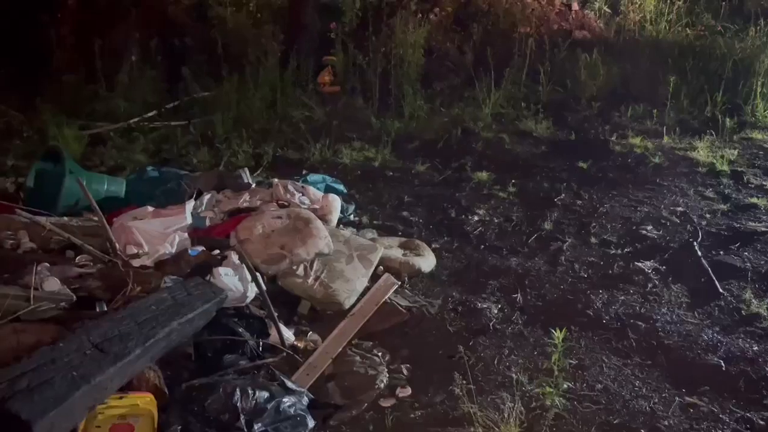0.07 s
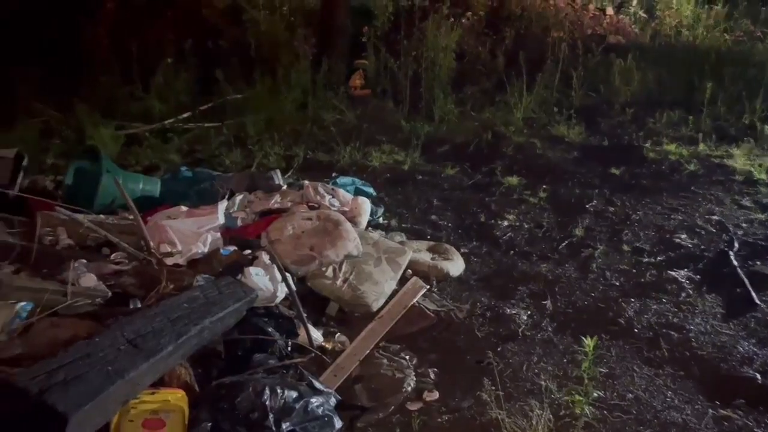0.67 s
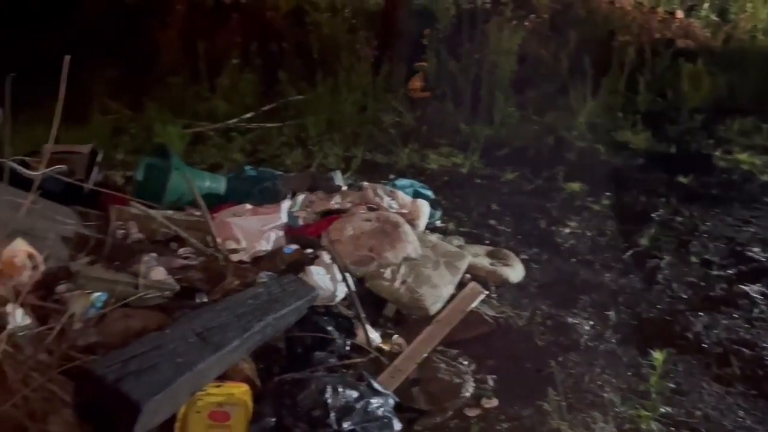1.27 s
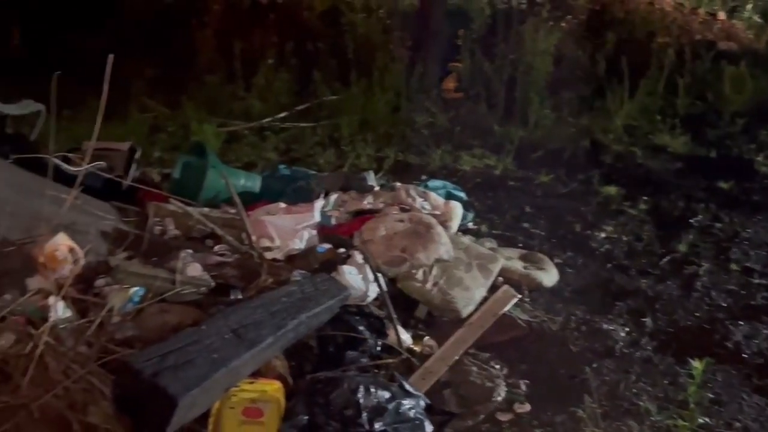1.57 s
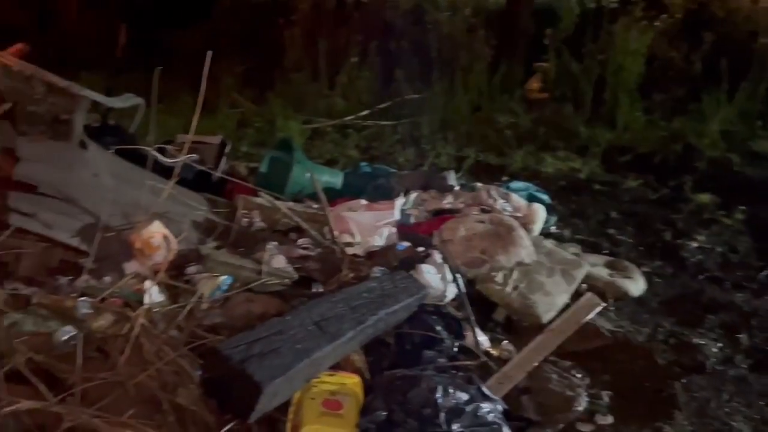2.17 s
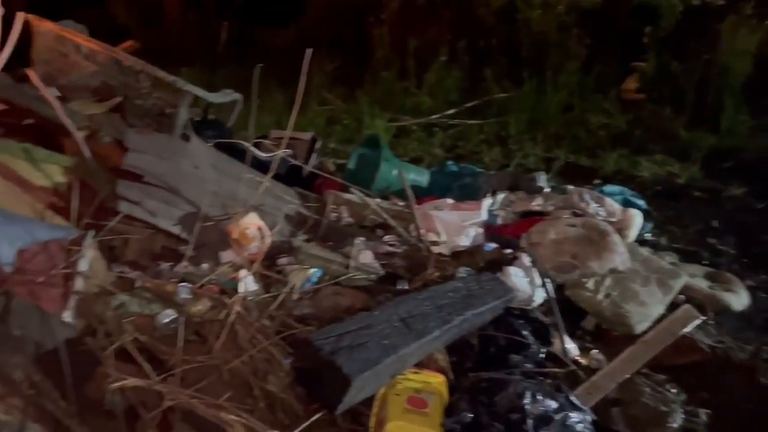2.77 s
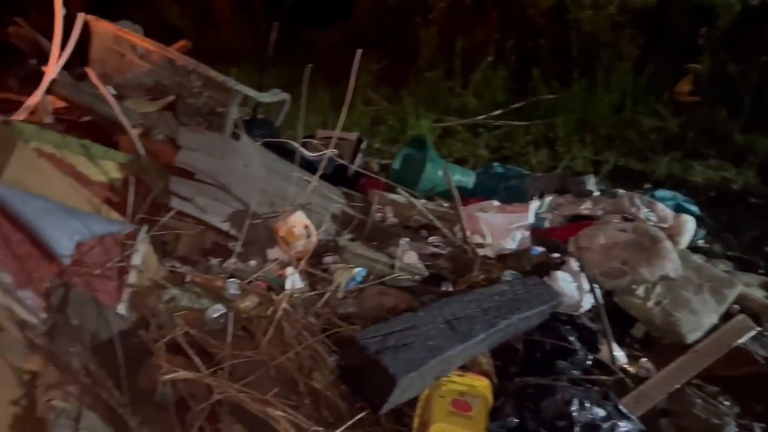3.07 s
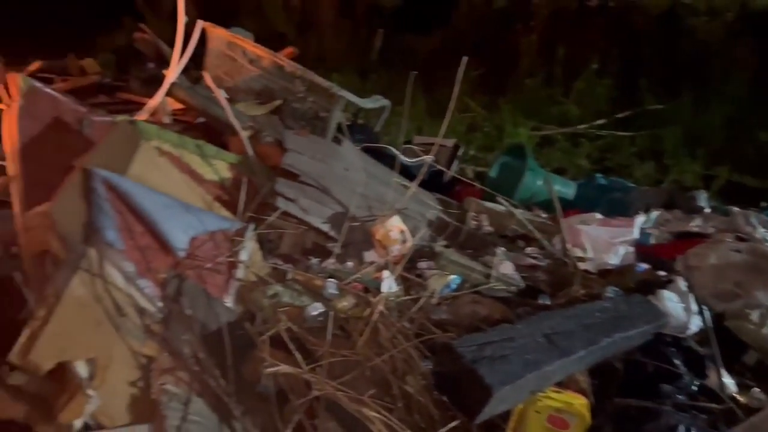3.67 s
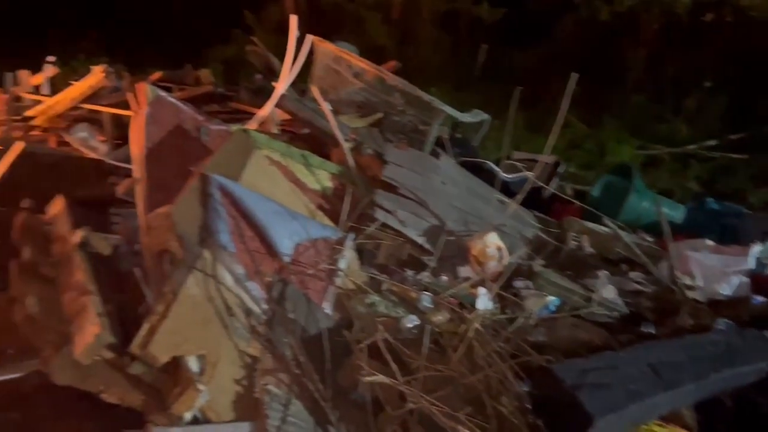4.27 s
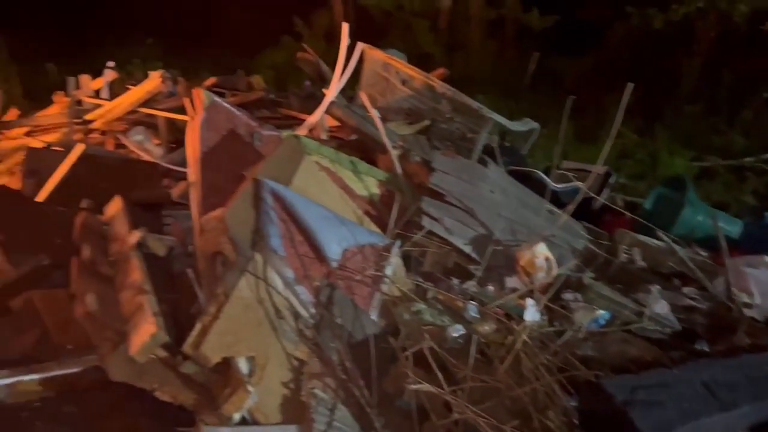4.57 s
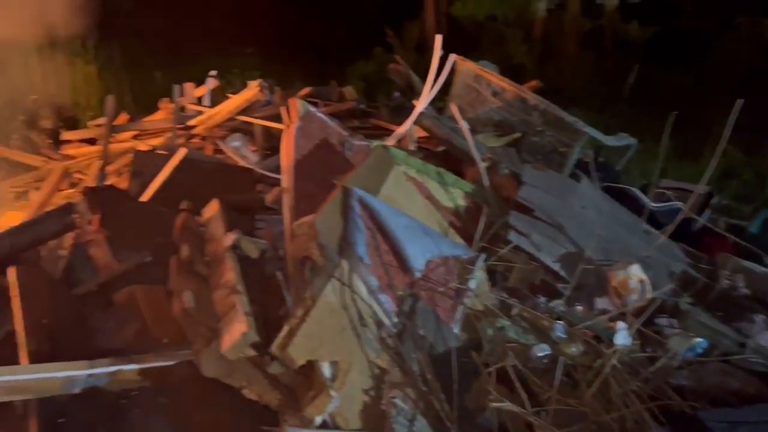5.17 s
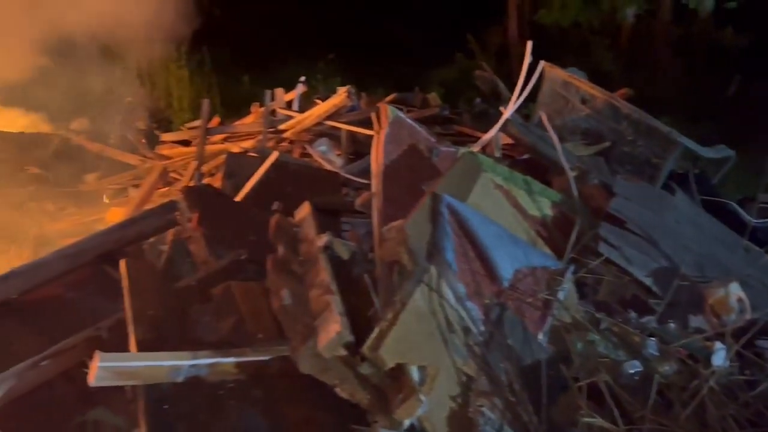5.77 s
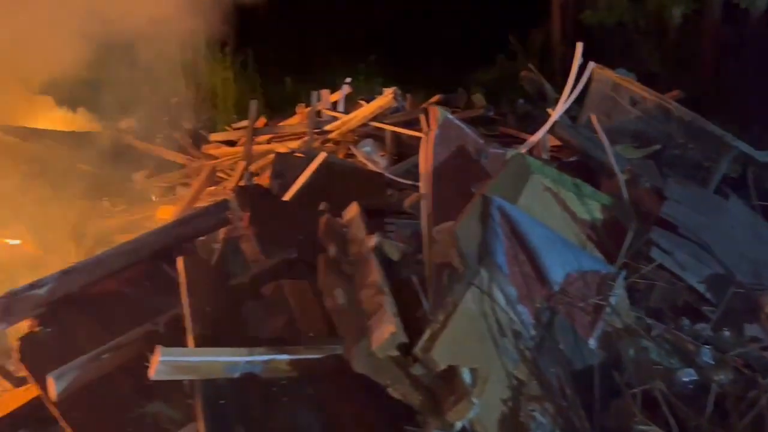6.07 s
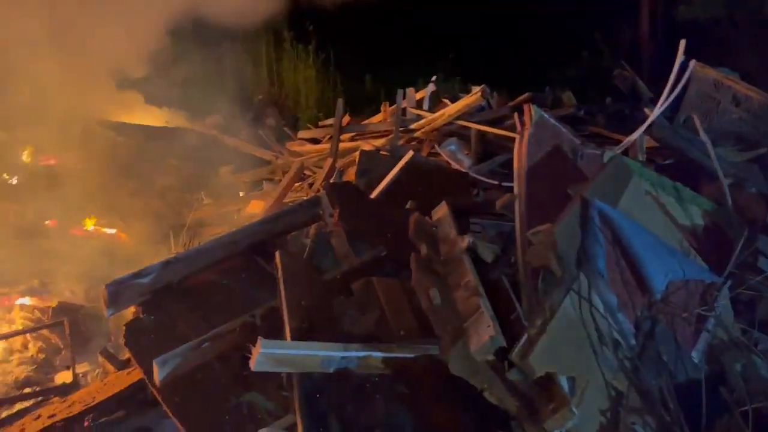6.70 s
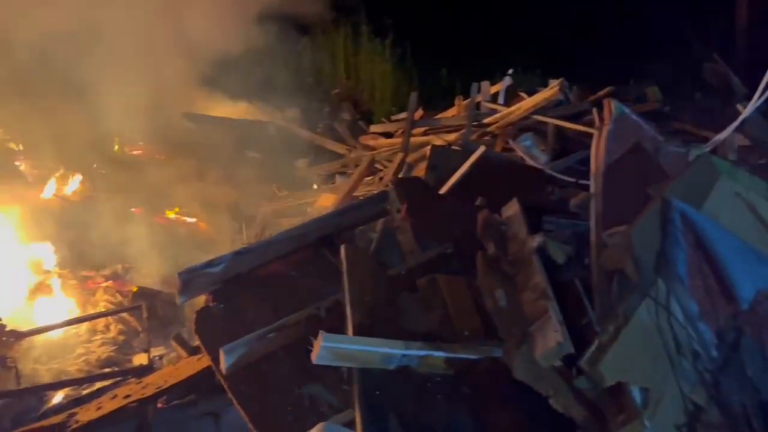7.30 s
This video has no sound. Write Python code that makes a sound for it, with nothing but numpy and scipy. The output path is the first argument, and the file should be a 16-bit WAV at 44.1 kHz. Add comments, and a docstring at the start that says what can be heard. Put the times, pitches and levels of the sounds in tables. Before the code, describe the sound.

Steady fire noise with fine crackle, irregular wood snaps and short sizzles that grow busier, while diesel engines drone far away.

```python
"""Wet timber fire at night

Outdoors, a stereo pair of microphones at the edge of a burning heap of wet timber and rubbish.
The blaze is a steady wash with fine crackle. Splitting wood snaps and boiling sap escapes in short jets
that sizzle or sing, more often as the pair turns to the flames; twice, gas catches with a soft puff.
Far off, two diesel engines idle under a low rumble."""
import sys
import numpy as np
from scipy import signal
from scipy.fft import rfft, irfft
from scipy.io import wavfile
from scipy.ndimage import uniform_filter1d

SR = 44100
rng = np.random.default_rng(int(sys.argv[2]) if len(sys.argv) > 2 else 0)


def generate_wav(sig):
    """Save sig (samples, or channels by samples) to the path in sys.argv[1] as 16-bit PCM at SR."""
    pcm = np.round(np.clip(np.atleast_2d(sig).T, -1, 1) * 32767).astype(np.int16)
    wavfile.write(sys.argv[1], SR, pcm)


N = 332514
TIME = np.arange(N) / SR
BAND_LIMIT_HZ = 12100

# the body and the hiss of the blaze, from the edge of the heap: frequency_hz, relative_db
BODY_SPECTRUM = [(100, -7), (300, -6.5), (600, 4.5), (950, 3), (1080, 1.5), (1190, 6), (1390, 1.5),
                 (1470, 4), (1600, -1), (1900, -1), (2700, -2.5), (3200, -6.5), (4500, -10.5), (7000, -14),
                 (12000, -85)]
HISS_SPECTRUM = [(1500, -10.5), (3000, 5), (4800, 7.5), (7000, 5.5), (9000, 4.5), (10000, -25),
                 (12000, -5.5)]
def blaze(body_db=-60.5, body_facing_db=-1.4, hiss_db=-75, hiss_facing_db=7.5, flicker_db=0.36):
    """The whole fire blends into a soft body and a hiss; the hiss opens up as the pair faces it."""
    body = at_microphones(turbulence(noise(), depth_db=2.0), BODY_SPECTRUM)
    body *= gain_of(body_db + body_facing_db * facing())
    hiss = at_microphones(turbulence(noise(), depth_db=4.5), HISS_SPECTRUM)
    hiss *= gain_of(hiss_db + hiss_facing_db * np.sqrt(facing()))
    return gain_of(flicker_db * drift(2, 40)) * (body + hiss)


def turbulence(sound, depth_db):
    """Turbulent air makes patches of the spectrum swell and fade."""
    spectra = signal.stft(sound, nperseg=1024)[2]
    patches = uniform_filter1d(rng.standard_normal(spectra.shape[1:]), size=6, axis=0)
    patches = unit_rms(uniform_filter1d(patches, size=5, axis=1))
    return signal.istft(spectra * gain_of(depth_db * patches), nperseg=1024)[1][:, :N]


def crackle(level_db=-84, facing_db=5, clicks_per_s=20, ring_cycles=0.62):
    """Countless small splinters each ring for a cycle or two; louder with the pair on the flames."""
    t, out = np.arange(400) / SR, np.zeros((2, N))
    for hz in np.geomspace(1000, 7500, num=10):
        ring = hz ** .3 * np.sin(2 * np.pi * hz * t) * np.exp(-t * hz / ring_cycles)
        out += signal.oaconvolve(clicks(clicks_per_s, spread_db=3), ring[None], axes=1)[:, :N]
    spectrum = [(1000, 2.0), (8000, -1.0), (12000, -27)]
    return gain_of(level_db + facing_db * facing()) * at_microphones(out, spectrum)


# snaps, duller the deeper they lie in the heap: start_s, level_db, ring_hz, ring_relative_db, top_hz
TIMBER_SNAPS = [(1.303, -63, 7100, -22, 6500), (1.45, -65, 3600, -10, 7000), (2.7145, -60, 2400, -7, 8000),
                (2.7516, -47, 4370, -27, 12000), (2.7556, -52, 2030, -4, 8500),
                (3.0315, -60, 1600, -19, 12000), (3.259, -48, 2230, -6, 7460),
                (3.5678, -65, 6500, -12, 12000), (4.0062, -64.5, 8800, -7, 12000),
                (4.4358, -56, 750, -12, 3020), (4.4818, -59.5, 990, -7, 2200),
                (4.5498, -55.5, 1490, -14, 2900), (4.5584, -57, 1500, -10, 3500),
                (4.701, -63, 7760, -4, 12000), (4.7566, -60.5, 8000, -5, 11000),
                (4.9952, -55, 820, -9, 2300), (5.107, -64.5, 6950, -12, 10000),
                (5.1812, -62, 2390, -5, 6000), (5.2545, -55, 7200, -13, 9000), (5.279, -54, 3040, -9, 9000),
                (5.3636, -54, 1510, -13, 8000), (5.3713, -59, 3030, -8, 9000),
                (5.3753, -59, 1880, -10, 7000), (5.398, -59, 1420, -9, 7000),
                (5.439, -56.5, 2350, -14, 7000), (5.4524, -61, 2480, -9, 8000),
                (5.482, -65.5, 1740, 5, 2500), (5.9168, -55, 1200, -10, 4300),
                (5.9389, -51.5, 1700, -21, 12000), (6.0482, -61, 1200, -2, 3000),
                (6.071, -61, 3500, -9, 9000), (6.217, -60, 8700, -11, 12000),
                (6.253, -60.5, 4470, -14, 10000), (6.3025, -60, 3900, -13, 9000),
                (6.315, -64.5, 4470, -9, 9000), (6.3952, -46.5, 745, -8, 7150),
                (6.396, -48, 1300, -13, 2900), (6.4037, -58.5, 1160, -3, 2800),
                (6.454, -55, 5200, -8, 8500), (6.535, -49.5, 2040, -4, 2690), (6.5408, -63, 2600, -4, 3300),
                (6.629, -55, 8050, -1, 12000), (6.766, -58, 3070, -5, 10800),
                (6.7918, -58, 5940, -16, 11000), (6.9745, -61.5, 1280, 7.5, 2200),
                (7.011, -56, 1740, -1, 5900), (7.376, -57.5, 920, -1.5, 8100),
                (7.5254, -48.5, 1940, -26, 14000)]
def timber_snaps():
    """Burning timber splits in front of the microphones, standing out of the crackle."""
    out = np.zeros((2, N))
    for start_s, level_db, ring_hz, ring_db, top_hz in TIMBER_SNAPS:
        add(out, start_s, gain_of(level_db) * snap(ring_hz, ring_db, top_hz))
    return out


# the crack and the thud of wood splitting nearby: frequency_hz, relative_db
CRACK_SPECTRUM = [(300, -5), (1100, 1), (1800, -1.5), (2500, 1), (3200, -5.5), (5500, -4.5), (8000, -3),
                  (10000, -12), (12000, -11)]
THUD_SPECTRUM = [(100, -1), (250, 20), (420, -4), (750, 5), (1200, -38), (3000, -53)]
def snap(ring_hz, ring_db, top_hz, crack_db=0.5, thud_db_per_octave=-18):
    """Wood splits with a crack, a thud and a brief ring; big pieces ring low and thud more."""
    low_hz = 0.6 * ring_hz  # a piece radiates little below this
    crack = gain_of(crack_db) * tearing_fibres(CRACK_SPECTRUM, low_hz, top_hz, peak_s=0.0014)
    thud_db = -1 + thud_db_per_octave * np.log2(ring_hz / 1000)
    thud = gain_of(thud_db) * tearing_fibres(THUD_SPECTRUM, 0, top_hz, peak_s=0.0028)
    return crack + thud + gain_of(ring_db) * splinter(ring_hz)


def tearing_fibres(spectrum, low_hz, top_hz, peak_s, scatter_s=0.005, stereo_width=0.76):
    """Fibres tear for a few milliseconds, and the sound scatters faintly off the heap."""
    t, hz = np.arange(2048) / SR, np.fft.rfftfreq(2048, 1 / SR)
    tear = (t / peak_s) ** 2 * np.exp(2 - 2 * t / peak_s)
    scatter = .14 * swell(t, scatter_s)
    mid, side = rng.standard_normal((2, len(t)))
    pair = np.array([mid + stereo_width * side, mid - stereo_width * side])
    band = hz ** 7 / (hz ** 7 + low_hz ** 7 + 1) / np.sqrt(1 + (hz / top_hz) ** 6)
    colour = gain_of(value_at(spectrum, hz) + balance_db(hz))
    return unit_impact((tear + scatter) * irfft(rfft(pair) * band * colour))


def splinter(hz, ring_cycles=4.5, overtone_ratio=1.42, overtone_db=-11):
    """A sliver of wood rings in two damped modes."""
    t = np.arange(2048) / SR
    overtone = gain_of(overtone_db) * np.sin(2 * np.pi * overtone_ratio * hz * t)
    attack = 1 - np.exp(-t / .0006)
    decay = np.exp(-t / (0.00032 + ring_cycles / hz))
    return unit_impact((np.sin(2 * np.pi * hz * t) + overtone) * attack * decay)


# steam from the wet wood, close by: frequency_hz, relative_db
STEAM_SPECTRUM = [(300, 22.5), (3000, 6), (8800, 5), (10000, -6), (12000, 7.5)]
# jets, of which the narrow ones sing: start_s, rise_s, level_db, centre_hz, width_octaves, spit_ratio
STEAM_JETS = [(1.415, 0.024, -66.5, 4460, 0.97, .2), (1.985, .06, -62, 5030, 1.2, 0.13),
              (2.758, 0.039, -51, 6360, 0.91, 0.34), (2.88, .05, -67.5, 6000, 1.1, 0.27),
              (4.48, 0.023, -63, 910, 0.16, 0.57), (4.525, 0.016, -62.5, 2650, 0.66, .6),
              (4.612, 0.027, -63.5, 1220, 0.11, .5), (5.195, 0.044, -57, 5400, 2.1, 0.86),
              (5.355, 0.042, -60.5, 3500, 2.3, 1.1), (5.34, 0.052, -64, 1190, 0.39, 1.1),
              (5.484, 0.03, -54.5, 9500, 2.25, 0.87), (5.935, 0.032, -59.5, 5470, 1.3, 0.57),
              (6.025, 0.052, -61, 4900, 2.1, 0.8), (6.36, 0.04, -59, 830, 0.98, 0.5),
              (6.448, 0.018, -57.5, 6000, 2.1, .7), (6.47, 0.037, -66, 2270, 0.33, 0.54),
              (7.0, 0.088, -66, 1750, 0.041, .2)]
def steam_jets(spits_per_s=260, steepness=1.21, loud_db=-53, loud_top_hz=14000, top_hz_per_db=379):
    """Pockets of boiling sap open, sputter and run out; some hiss smoothly, some spit."""
    sputter = gain_of(1.3 * drift(60, 200))
    hiss = sputter * at_microphones(noise(), STEAM_SPECTRUM)
    bubble = rng.standard_normal((1, 64)) * np.exp(-np.arange(64) / 20)
    bubbles = signal.oaconvolve(clicks(spits_per_s, spread_db=1.5), bubble, axes=1)[:, :N]
    spits = at_microphones(bubbles, STEAM_SPECTRUM)
    out, size = np.zeros((2, N)), SR // 2
    t, hz = np.arange(size) / SR, np.fft.rfftfreq(size, 1 / SR)
    for start_s, rise_s, level_db, centre_hz, width_octaves, spit_ratio in STEAM_JETS:
        part = slice(round(start_s * SR), round(start_s * SR) + size)
        gap_resonance = 1 / (1 + (np.log2((hz + 1) / centre_hz) / width_octaves) ** 2)
        top_hz = loud_top_hz + top_hz_per_db * (level_db - loud_db)  # weaker jets are duller
        lowpass = 1 / np.sqrt(1 + (hz / top_hz) ** 10)
        flow = hiss[:, part] + spit_ratio * spits[:, part]
        jet = unit_rms(irfft(rfft(flow) * gap_resonance * lowpass, size))
        pressure = swell(t, rise_s) ** steepness
        add(out, start_s, gain_of(level_db) * pressure * jet)
    return out


def twig_snaps(count=10, nearest_db=-67, spread_db=5, low_hz=2500, high_hz=8500):
    """Twigs snap faintly at random, more often as the pair turns to the flames."""
    out, chance = np.zeros((2, N)), np.cumsum(facing() ** 2)
    for when, thinness, distance in rng.random((count, 3)):
        start_s = np.interp(when * chance[-1], chance, TIME)
        twig = snap(low_hz + (high_hz - low_hz) * thinness, ring_db=-6, top_hz=BAND_LIMIT_HZ)
        add(out, start_s, gain_of(nearest_db - spread_db * distance) * twig)
    return out


# flares in the heap, alike in both microphones: start_s, level_db, centre_hz
GAS_FLARES = [(0.115, -60, 280), (1.34, -54.5, 185)]
def gas_flares(rise_s=0.033, width_octaves=0.57):
    """Pockets of gas catch with a soft, low puff."""
    out, size = np.zeros((2, N)), SR // 2
    t, hz = np.arange(size) / SR, np.fft.rfftfreq(size, 1 / SR)
    for start_s, level_db, centre_hz in GAS_FLARES:
        band = np.exp(-(np.log2((hz + 1) / centre_hz) / width_octaves) ** 2)
        puff = unit_rms(irfft(rfft(rng.standard_normal(size)) * band, size))
        add(out, start_s, gain_of(level_db) * swell(t, rise_s) ** 2 * puff[None])
    return out


# two diesels far off, in the centre: cycles_per_s, wander_ratio, [(order, level_db)]
DIESELS = [(10.177, 0.00075, [(4, -69.5), (7, -67), (8, -51.5), (9, -59.5), (16, -64.5), (22, -75),
           (23, -75), (24, -73.5), (59, -84)]), (11.32, 0.0078, [(4, -55.5), (5, -59.5), (8, -58.5),
           (10, -66)])]
def far_diesels(waver_db=1.55):
    """Only the low orders of the idling engines carry this far, wavering with the speed and the air."""
    out = np.zeros(N)
    for cycles_per_s, wander_ratio, orders in DIESELS:
        cycles = np.cumsum(cycles_per_s * (1 + wander_ratio * drift(0.297, 2.536))) / SR
        for order, level_db in orders:
            tone = np.sqrt(2) * np.sin(2 * np.pi * (order * cycles + rng.random()))
            out += gain_of(level_db + waver_db * drift(2, 9)) * tone
    return out


# the low background around the heap: frequency_hz, relative_db
RUMBLE_SPECTRUM = [(8, -39), (25, -15.5), (38, -4.5), (50, -1), (75, 0), (100, 1.5), (125, -5.5),
                   (160, -11.5), (210, -10.5), (270, -16), (400, -22.5), (800, -41), (2000, -99)]
def rumble(level_db=-51, waver_db=1.13):
    """The draught and distant machines make a low roar."""
    return gain_of(level_db + waver_db * drift(2, 14)) * at_microphones(noise(), RUMBLE_SPECTRUM)


# the pair turned away from the flames, and facing them: frequency_hz, left_right_likeness
AWAY_LIKENESS = [(90, 1), (200, -0.39), (350, 0.25), (600, -0.29), (900, -0.57), (1450, -0.23),
                 (2300, 0.39), (2900, 0.36), (3900, 0.54), (5200, 0.013), (7500, 0.31), (8600, -0.042)]
FACING_LIKENESS = [(90, 1), (200, 1), (350, 0.92), (600, 0.29), (1300, 0), (2300, 0.5), (2900, 0.094),
                   (3900, 0.28), (7000, 0.082), (8600, 0.55)]
def at_microphones(sources, spectrum, mono_hz=133):
    """Colours two unrelated signals and blends them as the turning pair hears them, at rms 1."""
    hz, (first, second) = np.fft.rfftfreq(N, 1 / SR), rfft(sources)
    colour = gain_of(value_at(spectrum, hz) + balance_db(hz))
    short_waves = hz ** 2 / (hz ** 2 + mono_hz ** 2)  # long waves reach both microphones alike
    views = []
    for likeness in (AWAY_LIKENESS, FACING_LIKENESS):
        apart = np.clip(1 - value_at(likeness, hz), 0, 2) * short_waves
        mid, side = first * np.sqrt(2 - apart), second * np.sqrt(apart)
        views.append(irfft(np.array([mid + side, mid - side]) * colour, N))
    away, towards = views
    return unit_rms((1 - facing()) * away + facing() * towards)


# the turn of the pair at the edge of the heap: time_s, facing_share
MICROPHONE_TURN = [(0, 0), (2, 0.2), (4, 0.48), (5.3, 0.95), (7.54, 0.92)]
def facing():
    """Where the pair points at every sample: 0 is away, 1 is straight at the flames."""
    return np.interp(TIME, *np.transpose(MICROPHONE_TURN))


# the treble leans to the left microphone: frequency_hz, left_minus_right_db
MICROPHONE_BALANCE = [(500, 0.5), (2300, 0), (3700, 3), (5500, 4.5), (7300, 3), (8300, 0)]
def balance_db(hz, corner_hz=266):
    """Level at the left and right microphone; they differ only for short waves."""
    return np.outer([.5, -.5], value_at(MICROPHONE_BALANCE, hz) * hz / (hz + corner_hz))


def noise():
    """Two unrelated white noises."""
    return rng.standard_normal((2, N))


def clicks(per_s, spread_db):
    """Two sparse trains of clicks, most small and a few large."""
    size = gain_of(spread_db * np.minimum(rng.exponential(1, (2, N)), 3))
    return np.sign(noise()) * size * (rng.random((2, N)) < per_s / SR)


def drift(slow_hz, fast_hz):
    """Random wavering between two rates, at rms 1."""
    hz = np.geomspace(slow_hz, fast_hz, num=24)[:, None]
    t = np.linspace(0, N / SR, num=2000)
    waves = np.sin(2 * np.pi * (hz * t + rng.random(hz.shape))) / np.sqrt(hz)
    return unit_rms(np.interp(TIME, t, waves.sum(0)))


def swell(t, peak_s):
    """Rises to 1 at peak_s, then dies away."""
    return t / peak_s * np.exp(1 - t / peak_s)


def gain_of(db):
    """Decibels to amplitude."""
    return 10 ** (np.asarray(db) / 20)


def unit_rms(x):
    """Scales to rms 1."""
    return x / np.sqrt(np.mean(x ** 2) + 1e-20)


def unit_impact(x):
    """Scales a short sound to the energy of 5 ms at rms 1."""
    return x / np.sqrt((x ** 2).sum(-1).mean() / (SR * .005))


def value_at(table, hz):
    """Reads a table along log frequency."""
    table_hz, values = np.transpose(table)
    return np.interp(np.log(hz + 1), np.log(table_hz + 1), values)


def add(mix, start_s, sound):
    """Mixes a sound into both channels from start_s."""
    part = mix[:, round(start_s * SR):][:, :sound.shape[1]]
    part += sound[:, :part.shape[1]]


def scene():
    """The fire close in front, the engines and the rumble far behind."""
    background = far_diesels() + rumble()
    return background + gas_flares() + blaze() + crackle() + steam_jets() + timber_snaps() + twig_snaps()


def record(dry):
    """The recorder opens after a moment and cuts the highest treble steeply."""
    opened = np.clip((TIME - .034) / .002, 0, 1)
    lowpass = signal.firwin(511, BAND_LIMIT_HZ, window=("kaiser", 9), fs=SR)
    return signal.oaconvolve(dry * opened, lowpass[None], "same")


dry = scene()
out = record(dry)
generate_wav(out)
```